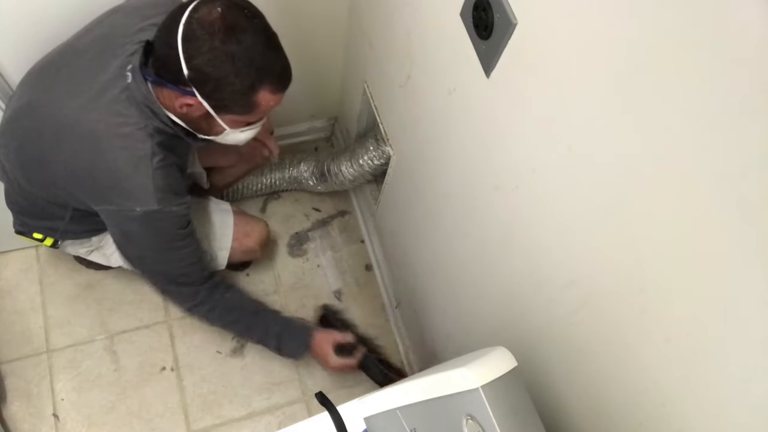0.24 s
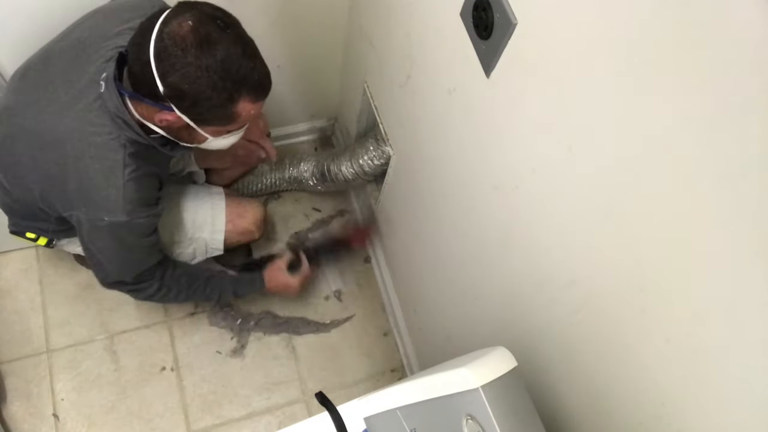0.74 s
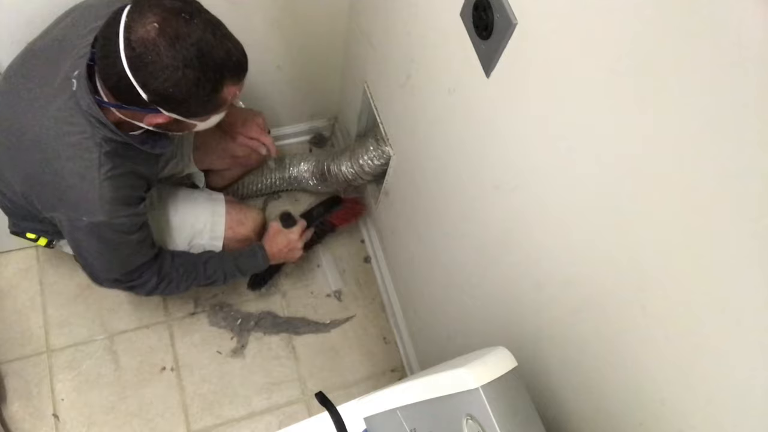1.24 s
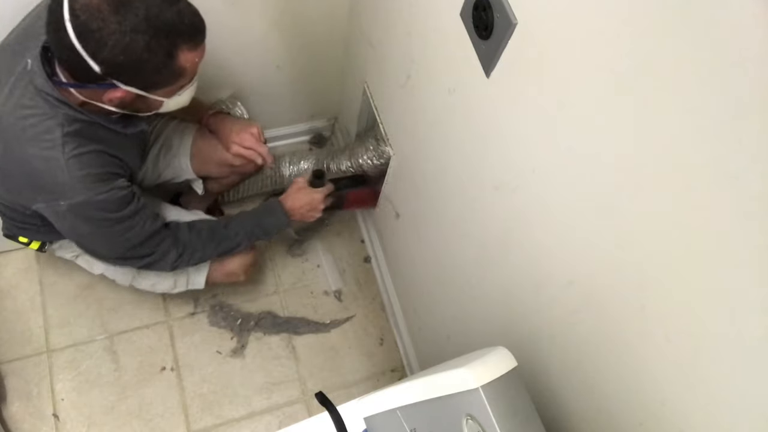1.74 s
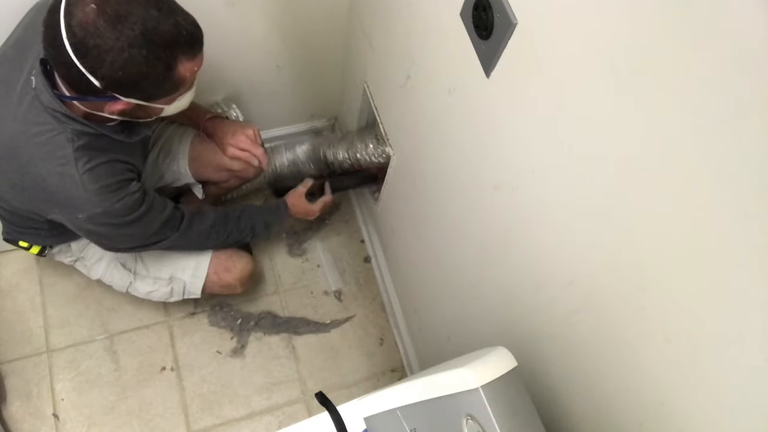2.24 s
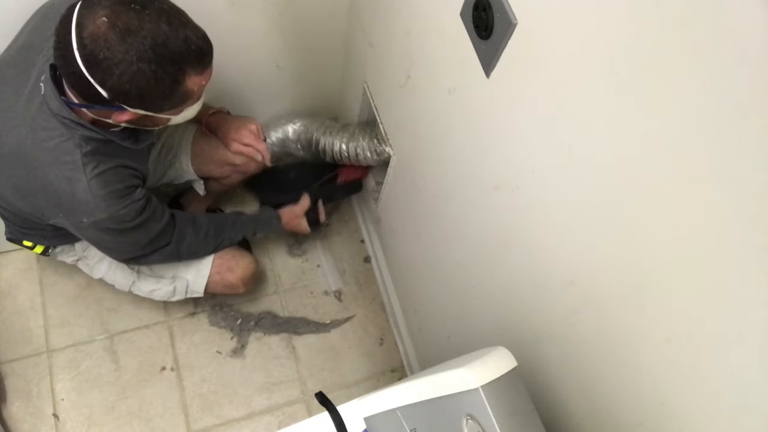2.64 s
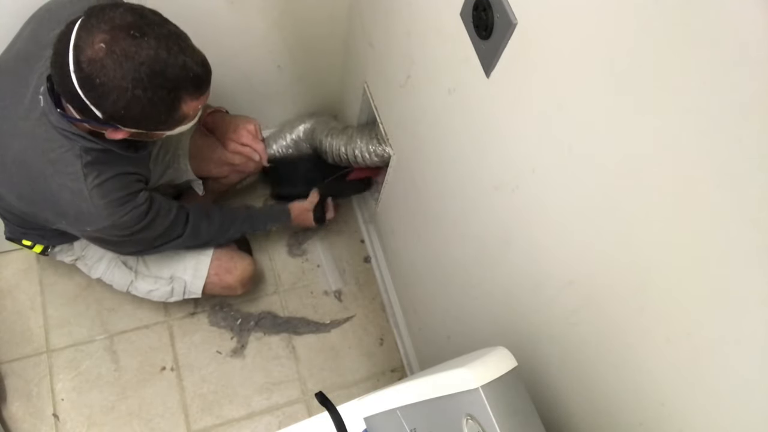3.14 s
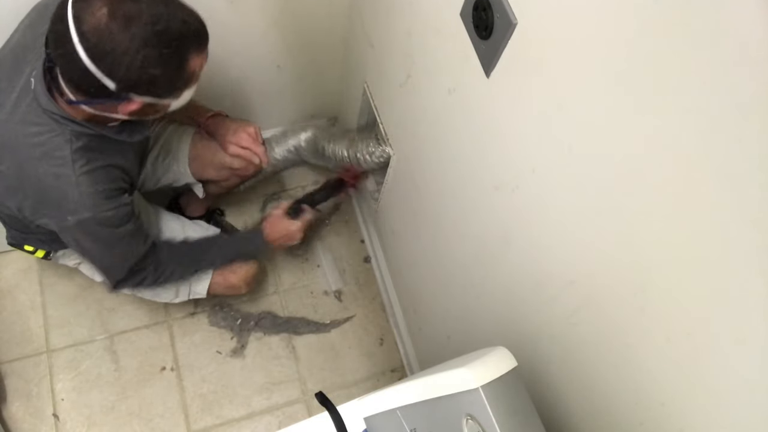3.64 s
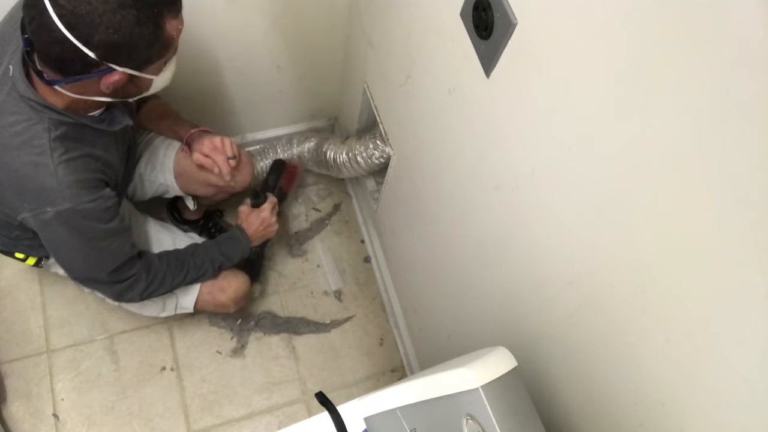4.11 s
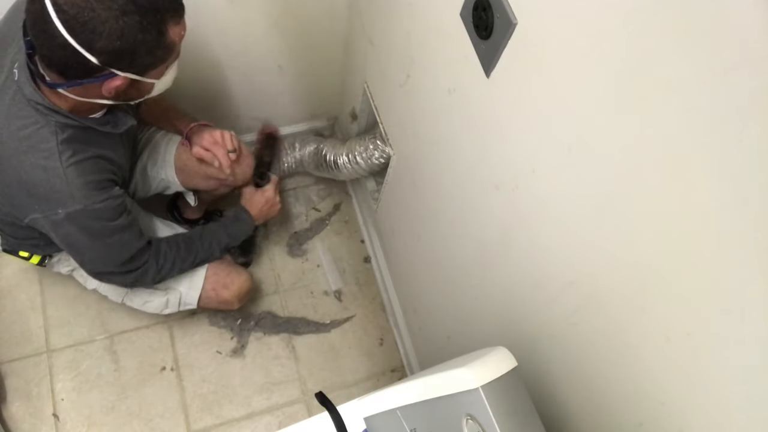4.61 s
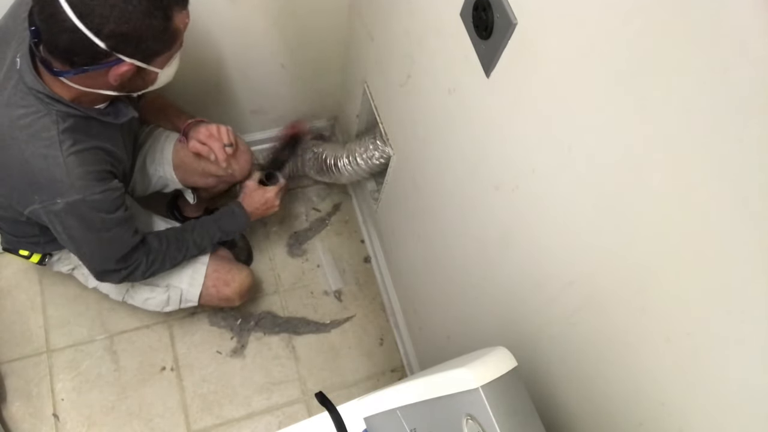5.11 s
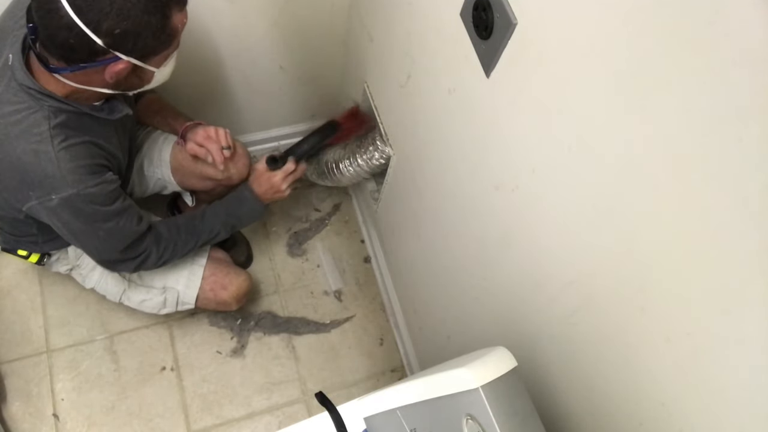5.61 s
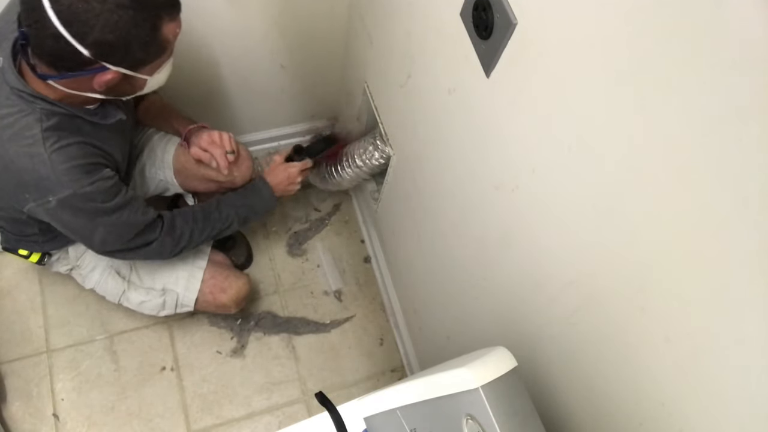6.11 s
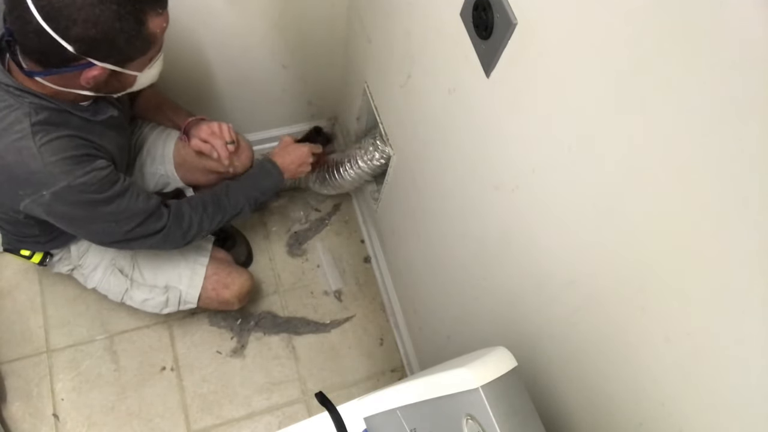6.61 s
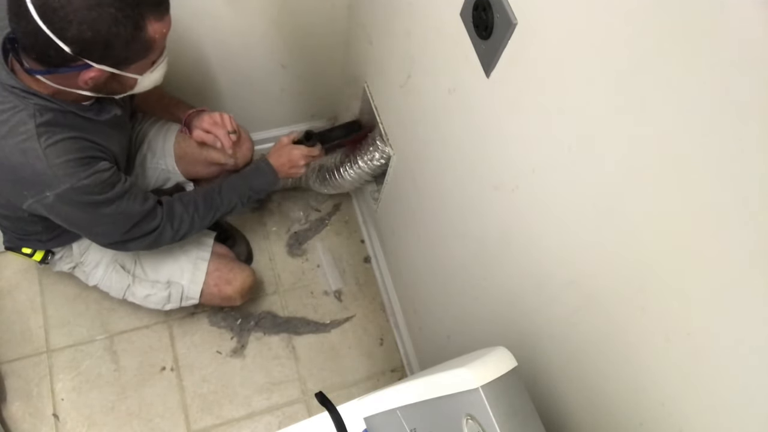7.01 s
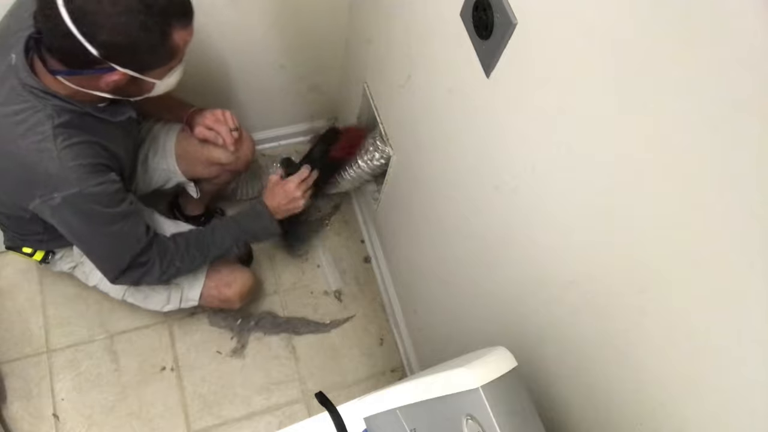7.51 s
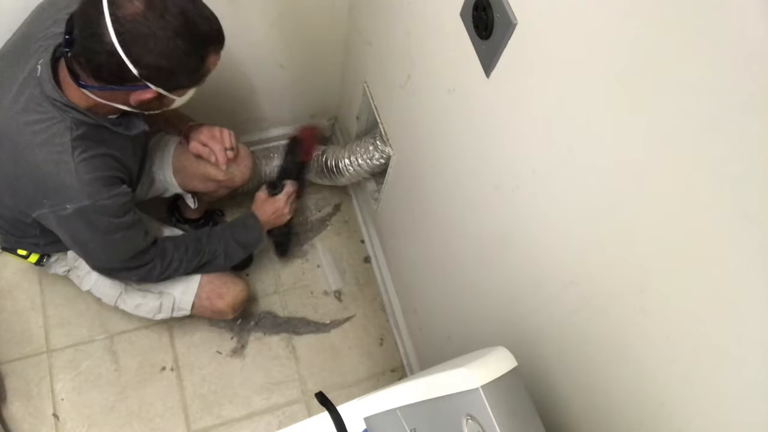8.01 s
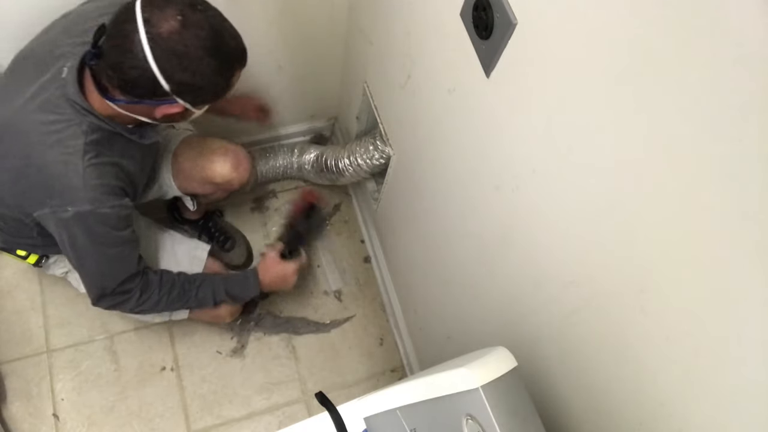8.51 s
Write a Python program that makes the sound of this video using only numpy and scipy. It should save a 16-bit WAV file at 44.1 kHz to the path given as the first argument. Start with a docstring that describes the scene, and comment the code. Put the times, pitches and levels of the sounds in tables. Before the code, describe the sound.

Stiff bristles brush a tile floor, quiet and quick at first, then scratch harder against skirting and wall. Two solid, boomy knocks stand out among the jabs. After a soft low rustle of clothing come strong separate swishes along a thin metal duct, a bright snap, and uneven dabbing with small plastic clacks that fades to almost nothing. Short indoor reflections, nearby microphone, faint steady room tone.

```python
"""Bristles hiss and flick over tile as a hand broom sweeps lint, then along a wall and a foil duct.
Random clicks over smooth noise, shaped stroke by stroke, drive coloured hiss, scrape and rumble;
two soft low rustles of sleeve or body are made the same way.
The broom's block knocks on wall and plastic dustpan, ringing their modes; grit ticks.
Tufts swish free, stiff bristles rasp and the rubbed wall panel drones.
Random reflections make the small room; faint air noise and wavering tones lie beneath."""
import sys
import numpy as np
from scipy import signal
from scipy.io import wavfile
from scipy.ndimage import uniform_filter1d

SR = 44100
rng = np.random.default_rng(int(sys.argv[2]) if len(sys.argv) > 2 else 0)


def digitize_waveform(pressure):
    """Quantize a signal to 16-bit integers and store it at the path in sys.argv[1].

    Rows of a 2-D input are taken as channels; values are limited to [-1, 1].
    """
    field = np.atleast_2d(pressure).T
    bounded = np.clip(field, -1, 1)
    quanta = np.round(bounded * 32767).astype(np.int16)
    wavfile.write(sys.argv[1], SR, quanta)


N = 385875

# Levels are relative, ahead of the layer gains, unless marked rms. Spectra set shape only.

# still room air: (frequency [Hz], density [dB per Hz])
AIR_SPECTRUM = [(20, -11), (45, 4), (120, -2.5), (175, -16), (240, -9), (400, -13), (700, -15.5),
                (1000, -19.5), (1300, -17.5), (3000, -25), (8000, -32), (15000, -34.5)]
AIR_RMS_DB = -63
# faint steady tones in the room: (frequency [Hz], rms level [dB])
ROOM_TONES = [(118.4, -68.5), (242, -78.5), (947.5, -81), (1055, -80.5), (1755, -85.5)]
# room decay: (frequency [Hz], t60 [s])
ROOM_DECAY = [(100, 0.4), (500, 0.33), (2000, 0.17), (6000, 0.22), (14000, 0.21)]
# wall panel modes: (frequency [Hz], level [dB], t60 [s])
WALL_MODES = [(55, -4.5, 0.22), (67, -2.5, 0.17), (90.1, -5.5, 0.33), (127, 1, 0.24), (146.8, 0.5, 0.18),
              (164, 1.5, 0.092), (204.4, -3, 0.13)]
# ribbed foil duct modes: (frequency [Hz], level [dB], t60 [s])
DUCT_MODES = [(570.4, 6.5, 0.22), (930, -23, 0.18), (1126, -1.5, 0.18), (1180, 11, 0.31), (1360, 7, 0.09),
              (1790, 20.5, 0.063), (2060, -13, 0.13), (2706, 24, 0.023), (2895, 21.5, 0.032),
              (4190, 18, 0.035)]
# plastic dustpan modes: (frequency [Hz], level [dB], t60 [s])
PAN_MODES = [(243, 4, 0.071), (295.3, 1, 0.11), (348.7, -2, 0.17), (424.4, -11.5, 0.21), (490, -15, 0.093),
             (885, -6, 0.073), (1253, -15, 0.12), (1914, -2.5, 0.025), (2770, -19, 0.056), (3340, -2, 0.02)]
# panel drone while the broom leans on it, 20 dB rise and fall:
# (time at full level [s], rise [s], hold [s], fall [s], rms level [dB])
LEANS = [(.7, 0.082, .15, .1, -64), (2.15, 0.34, 0.36, .45, -45), (3.55, .3, 0.063, 0.26, -44.5),
         (4.1, 0.25, 0.089, 0.45, -42.5), (5.835, 0.055, .03, .08, -41), (6.19, 0.04, 0.034, .06, -36.5),
         (6.62, 0.032, 0.011, 0.055, -34.5)]
# deep rumble of the hollow wall: (frequency [Hz], density [dB per Hz])
RUMBLE_SPECTRUM = [(25, -45), (38, -28), (52, -10), (74, -13.5), (90, -3.5), (112, -10), (138, -2.5),
                   (175, -11), (300, -25.5), (1000, -63)]
# broom's block shaken by its bristles: (frequency [Hz], density [dB per Hz])
BLOCK_SPECTRUM = [(90, -15), (175, -12), (212, 4.5), (245, -0.5), (290, -2), (345, 1.5), (430, -10),
                  (700, -15), (2000, -59.5)]
# firmness on the hollow wall, scaling the deep rumble: (time [s], level [dB])
WALL_FIRMNESS = [(0, -20), (1.1, -16), (1.7, 2), (2.7, -8.5), (4.2, 2.5), (5.4, -6), (5.9, -2), (6.7, -2),
                 (7.3, 0), (7.85, -1), (8.2, -8)]
# grit and snapping bristles: (time [s], level [dB])
TICK_EVENTS = [(0.045, -47), (.126, -53.5), (0.418, -61), (0.884, -58), (2.979, -36), (3.097, -36.5),
               (3.203, -43), (3.733, -38), (4.231, -39.5), (4.297, -54), (4.866, -50.5), (5.297, -46.5),
               (5.336, -42), (5.406, -33), (6.012, -47), (6.052, -45.5), (6.2108, -23), (6.2258, -16),
               (6.51, -35.5), (6.638, -32), (7.537, -47.5), (7.596, -44), (7.657, -48.5), (7.725, -46),
               (8.525, -56)]
# grit tick: (frequency [Hz], density [dB per Hz])
TICK_SPECTRUM = [(300, 0), (800, -9), (1300, 2.5), (2200, -4.5), (2950, 3), (3700, -2.5), (6000, -6),
                 (9000, -11.5), (15000, -22)]
# stiff bristles dragged end-on, 20 dB rise and fall:
# (time at full level [s], rise [s], hold [s], fall [s], level [dB])
RASPS = [(.595, 0.091, .01, 0.069, -51), (.995, 0.054, 0.0084, 0.044, -51), (6.213, .05, .005, 0.035, -40)]
# tufts springing free: (time [s], level [dB], fizz over it [dB])
SWISHES = [(2.458, -33, -20), (2.754, -46, -18), (3.267, -28.5, -21), (3.566, -28.5, -20),
           (4.501, -33, -19), (6.224, -46, -6), (7.779, -30.5, -18), (8.207, -38, -1), (8.313, -44, -12)]
# blows of the block:
# (time [s], crack [dB], wall boom [dB], dustpan clack [dB], treble over the crack [dB])
KNOCKS = [(1.59, -32.5, -37.5, -41.5, -8), (1.887, -37, -22, -30, -6), (1.903, -33, -29, -60, -7),
          (1.943, -33, -43, -40, -18), (2.229, -24, -15.5, -24, -13), (2.251, -32, -47, -29, -6),
          (2.58, -43, -35, -36.5, -13), (3.263, -48, -51, -53, 6), (3.421, -24, -21, -25, -6.5),
          (3.452, -31, -21, -45, -23), (4.692, -50, -46, -46.5, -21), (5.026, -30.5, -36, -36, -5),
          (5.452, -34, -52, -51, 0), (5.843, -42, -40, -42, -12), (6.211, -40, -46, -52, -2),
          (6.611, -40, -44, -38, -14), (7.248, -52, -33.5, -43, -10), (7.309, -33, -37, -28.5, 0),
          (7.389, -56, -42.5, -49, -15), (7.865, -32, -58, -34.5, -19), (7.998, -46, -49, -42, -9.5),
          (8.163, -34, -51, -31.5, -8.5), (8.232, -38, -41, -32.5, 0), (8.408, -37, -45, -36.5, -29)]
# crack of the block: (frequency [Hz], density [dB per Hz])
CRACK_SPECTRUM = [(150, -32.5), (550, 4.5), (700, -2.5), (1000, 3.5), (1700, 2), (2300, -5), (3300, -11.5),
                  (4400, -17.5), (8000, -21.5), (15000, -32)]
# bristle tips sliding on tile: (frequency [Hz], density [dB per Hz])
HISS_SPECTRUM = [(400, -12), (1500, -4), (2400, 0.5), (3100, 2), (4200, -0.5), (4950, -4.5), (5600, -2.5),
                 (7300, -6.5), (8400, -11.5), (10400, -14.5), (15500, -14)]
# fine fizz of the bristle tips: (frequency [Hz], density [dB per Hz])
FIZZ_SPECTRUM = [(2000, -41), (5000, 4.5), (7000, 4.5), (9500, 4.5), (10400, -3.5), (11500, 4), (15500, 3)]
# bristles dragged over skirting and duct: (frequency [Hz], density [dB per Hz])
SCRAPE_SPECTRUM = [(200, -12.5), (400, -6), (580, -2), (720, -2.5), (1050, 2), (1380, 4.5), (1900, 3.5),
                   (2400, -5.5), (3000, -16), (5000, -10.5), (9000, -56), (15000, -37)]
# strokes: long and light on tile, jabs into the corner, broad along the duct, quick dabs, drawing back;
# also soft low rustles of sleeve or body near 3.8 and 8.6 s;
# 20 dB rise and fall: (time at full pressure [s], rise [s], hold [s], fall [s], hiss [dB],
# scrape over hiss [dB], rumble over hiss [dB], fizz over hiss [dB])
STROKES = [(0.0, 0.049, 0.0092, 0.13, -55.5, -8, -6, 0.5), (0.13, 0.03, 0.03, 0.16, -61.5, -7, -11.0, -2.5),
           (0.451, 0.07, 0.068, 0.096, -50.5, -9, -6.5, -7.0),
           (0.6, 0.2, 0.051, 0.097, -47.5, -16, -12.5, -4.0),
           (0.89, 0.028, 0.05, 0.084, -72, -13, -15.5, 4),
           (1.004, 0.17, 0.0085, 0.12, -51.5, -7.5, -7.5, -12),
           (1.083, 0.076, 0.042, 0.14, -50, -10, -4, -3.5),
           (1.483, 0.03, 0.055, 0.31, -42, -4.5, -6.5, -10),
           (1.704, 0.15, 0.052, 0.058, -44.0, -3, -6, -10), (1.887, 0.061, 0.053, 0.146, -49, -7, -3, 0),
           (2.028, 0.081, 0.059, 0.086, -35, -5, -7.0, -13.0),
           (2.235, 0.157, 0.063, 0.36, -42, 0.5, -5, -13), (2.396, 0.04, 0.033, 0.068, -34, -5, -3, -14),
           (2.527, 0.037, 0.079, 0.205, -43.0, 0.5, -6.5, -12),
           (2.679, 0.052, 0.064, 0.044, -33.5, -5.5, -5, -17.0),
           (2.83, 0.061, 0.15, 0.14, -43, 1, 4.5, -15.0), (2.993, 0.07, 0.018, 0.038, -32.5, -5.5, -9, -19),
           (3.1, 0.088, 0.14, 0.15, -44, 2, 4, -11), (3.264, 0.029, 0.02, 0.12, -32.5, -3.0, -7, -16.5),
           (3.401, 0.04, 0.054, 0.2, -40.5, -3.5, -11, -16.0),
           (3.55, 0.033, 0.02, 0.14, -31, -2.5, -5, -10.5),
           (3.752, 0.062, 0.016, 0.07, -45.5, -3.5, 2.0, -11),
           (3.809, 0.054, 0.13, 0.099, -67, 5.5, 23.5, -15),
           (3.975, 0.07, 0.004, 0.027, -41.5, 3, 1, -12.5),
           (4.085, 0.092, 0.043, 0.056, -33.0, -4.5, -6.5, -8.5),
           (4.224, 0.048, 0.04, 0.17, -59.5, 2.5, 8.5, -5), (4.565, 0.097, 0.018, 0.053, -26, -6, -8.5, -8),
           (4.922, 0.043, 0.0063, 0.069, -47.5, 3.5, 0.5, -4),
           (5.028, 0.073, 0.0055, 0.051, -24, -5.5, -8.5, -11),
           (5.374, 0.056, 0.025, 0.096, -37, -1, 1, -20), (5.45, 0.084, 0.031, 0.04, -26, -6, -8.5, -9),
           (5.64, 0.074, 0.043, 0.24, -60, -10, -2, -12), (5.8, 0.061, 0.057, 0.08, -30.5, -3.5, -3.5, -9),
           (6.157, 0.11, 0.046, 0.067, -37.0, -6, -11, -13.0), (6.199, 0.058, 0.027, 0.2, -37, 1.5, 2, -21),
           (6.472, 0.052, 0.1, 0.1, -48, -1, -9, -11),
           (6.602, 0.081, 0.038, 0.036, -36.5, -6.5, -1.5, -8.5),
           (6.795, 0.13, 0.025, 0.076, -38.5, -2.5, -13, -13),
           (6.91, 0.067, 0.0067, 0.095, -35.0, -3.5, -1, -10.5),
           (7.109, 0.055, 0.014, 0.036, -40, -1, -17, -3), (7.214, 0.053, 0.024, 0.044, -34, -1, 0, -8.5),
           (7.303, 0.17, 0.073, 0.14, -45, 1.0, -7, -10), (7.592, 0.091, 0.0054, 0.15, -47.5, -3.5, -6, -3),
           (7.789, 0.073, 0.05, 0.095, -30.5, -5.5, -9.5, -8),
           (7.858, 0.052, 0.007, 0.152, -42, 4.5, 4.5, -18), (8.146, 0.029, 0.025, 0.099, -50, 1.5, 0, -10),
           (8.27, 0.1, 0.027, 0.069, -34.0, -1.5, -2, -10), (8.405, 0.062, 0.045, 0.12, -56, 5, 2, -22),
           (8.61, 0.061, 0.14, 0.12, -72, 6, 10.5, -13)]
# trail after each row, each layer against its swell: (hiss [dB], scrape [dB], rumble [dB], fizz [dB])
TRAIL_DB = (-20, -15, -2.5, -32)
TRAIL_FALL_S = 0.18  # over 20 dB
CONTROL_HZ = 1000
RISE_CURVE = 1.2  # over 1: pressure builds fastest at touch-down
SHAKE_LAG_S = 0.013  # block and wall shake after the bristles, as the stroke is checked
EDGE_HZ = 15650


def amp(db):
    """Converts dB to gain."""
    return 10 ** (np.asarray(db) / 20)


def unit(x):
    """Scales to rms 1."""
    return x / np.sqrt(np.mean(x ** 2) + 1e-20)


def read(points, hz):
    """Reads a table along a log-frequency axis."""
    table_hz, value = np.transpose(points)
    return np.interp(np.log(hz + 1), np.log(table_hz + 1), value)


def follow(rows):
    """Each column of a curve table, sample by sample."""
    time_s, *columns = np.transpose(rows)
    return [np.interp(np.arange(N) / SR, time_s, column) for column in columns]


def add(mix, time_s, sound):
    """Lays a sound into the mix at time_s."""
    part = mix[max(round(time_s * SR), 0):][:len(sound)]
    part += sound[:len(part)]


def late(x, delay_s):
    """Delays x by delay_s."""
    return np.interp(np.arange(N) - delay_s * SR, np.arange(N), x, left=0)


def through(x, response):
    """Passes x through an impulse response scaled to energy 1."""
    return signal.oaconvolve(x, response / np.linalg.norm(response))[:N]


def colour(x, spectrum, size=4096):
    """Minimum-phase filter with the given spectrum."""
    hz = abs(np.fft.fftfreq(size, 1 / SR))
    log_gain = np.log(amp(read(spectrum, hz)))
    response = np.fft.ifft(np.exp(np.conj(signal.hilbert(log_gain)))).real
    return through(x, response)


def ring(x, modes):
    """Rings a body's decaying modes, alternating in polarity."""
    t = np.arange(SR // 2) / SR
    response = np.zeros(len(t))
    for k, (hz, db, t60_s) in enumerate(modes):
        response += (-1) ** k * amp(db - 60 * t / t60_s) * np.sin(2 * np.pi * hz * t)
    return through(x, response)


def flicks(per_s, spread_db, smooth):
    """Bristles catch and let go: random clicks of uneven size over smooth sliding noise."""
    size = amp(spread_db * np.minimum(rng.exponential(1, N), 4))
    clicks = size * rng.choice([-1, 1], N) * (rng.random(N) < per_s / SR)
    return unit(unit(clicks) + smooth * rng.standard_normal(N))


def clumps(length_s):
    """Tufts grip and release together: smoothed noise of rms 1."""
    return unit(uniform_filter1d(rng.standard_normal(N), max(int(length_s * SR), 2)))


def contact(scatter, fall_s, rise_s=0.00023):
    """One impact and a short rattle, cushioned over rise_s; energy of 10 ms at rms 1."""
    t = np.arange(SR // 10) / SR
    rattle = rng.standard_normal(len(t)) * np.exp(-t / fall_s) * (1 - np.exp(-t / rise_s))
    blow = (t == 0) + scatter * rattle / np.linalg.norm(rattle)
    return blow / np.linalg.norm(blow) * np.sqrt(SR / 100)


def waver(hz, wander_hz):
    """A tone of rms 1 whose pitch drifts at random, by wander_hz rms."""
    drift = unit(uniform_filter1d(rng.standard_normal(N), size=3000))
    return np.sqrt(2) * np.sin(2 * np.pi * np.cumsum(hz + wander_hz * drift) / SR)


def swell(full_s, rise_s, hold_s, fall_s):
    """Pressure builds, holds, and lets go evenly in dB; a gain at the control rate."""
    t = np.arange(N * CONTROL_HZ // SR + 1) / CONTROL_HZ - full_s
    before = np.maximum(-t / rise_s, 0) ** RISE_CURVE
    after = np.maximum((t - hold_s) / fall_s, 0)
    return amp(-20 * (before + after))


def level(gains):
    """Joint level in dB of overlapping swells, sample by sample."""
    db = 10 * np.log10(np.sum(np.square(gains), axis=0) + 1e-14)
    return np.interp(np.arange(N) * CONTROL_HZ / SR, np.arange(len(db)), db)


def swells(rows):
    """The gain of a table of swells."""
    return amp(level([amp(db) * swell(*shape) for *shape, db in rows]))


def strokes():
    """Strokes and rustles swell and trail off: hiss in dB, then scrape, rumble and fizz over it."""
    layers = []
    for full_s, rise_s, hold_s, fall_s, hiss_db, *over_db in STROKES:
        press = swell(full_s, rise_s, hold_s, fall_s)
        trail = swell(full_s, rise_s, hold_s, TRAIL_FALL_S)
        gains = []
        for db, trail_db in zip([0, *over_db], TRAIL_DB):
            gains.append(amp(hiss_db + db) * np.maximum(press, amp(trail_db) * trail))
        layers.append(gains)
    hiss_db, *others_db = [level(layer) for layer in zip(*layers)]
    return [hiss_db] + [other_db - hiss_db for other_db in others_db]


def room(x, gap_s=.003):
    """Close walls: dense random reflections after a gap, decaying at a rate set by frequency."""
    t = np.arange(SR // 2) / SR
    taps = rng.standard_normal(len(t)) * (rng.random(len(t)) < 4000 / SR) * (t > gap_s)
    hz, age_s, bins = signal.stft(taps, SR, nperseg=256)
    decay = amp(-60 * age_s / read(ROOM_DECAY, hz)[:, None])
    return through(x, signal.istft(bins * decay, SR, nperseg=256)[1])


def moving_room(x, count=4, turn_hz=7):
    """The broom's tips move about and their wall paths change: a turning blend of rooms."""
    turn = 2 * np.pi * turn_hz * np.arange(N) / SR
    echoes = sum(room(x * np.cos(turn + np.pi * k / count)) for k in range(count))
    return echoes * np.sqrt(2 / count)


def still_air():
    """Steady noise with the spectrum of the still room."""
    return amp(AIR_RMS_DB) * colour(rng.standard_normal(N), AIR_SPECTRUM)


def room_tones():
    """Faint steady tones, each drifting slightly in pitch."""
    return sum(amp(db) * waver(hz, wander_hz=6.25) for hz, db in ROOM_TONES)


def drone():
    """The rubbed wall panel keeps sounding its main mode."""
    return swells(LEANS) * waver(hz=146.0, wander_hz=4.18)


def rumble(block_db=-4, wall_db=-2.5, boom_db=-8, boom_hz=90, boom_t60_s=0.5):
    """Strokes shake the broom's block and the wall, whose boom mode lingers; rustles add low noise."""
    hiss_db, _, weight_db, _ = strokes()
    push = late(amp(hiss_db + weight_db), SHAKE_LAG_S)
    block = push * colour(flicks(per_s=400, spread_db=2.5, smooth=0.41), BLOCK_SPECTRUM)
    shake = colour(flicks(per_s=380, spread_db=1.0, smooth=0.88), RUMBLE_SPECTRUM)
    wall = push * amp(follow(WALL_FIRMNESS)[0]) * shake
    # boom level is set against the wall's, ahead of wall_db
    boom = amp(boom_db) * unit(ring(wall, [(boom_hz, 0, boom_t60_s)])) * wall.std()
    return amp(block_db) * block + amp(wall_db) * wall + boom


def grit(gain_db=-2):
    """Short bright ticks of grit and single stiff bristles."""
    hits = np.zeros(N)
    for time_s, db in TICK_EVENTS:
        add(hits, time_s, amp(db) * contact(scatter=2.4, fall_s=0.0066))
    return amp(gain_db) * colour(hits, TICK_SPECTRUM)


def knocks(crack_gain_db=3, boom_gain_db=1.5, pan_gain_db=3, duct_db=-11, flex_s=0.0012):
    """Blows crack, splay bristles, ring duct and dustpan; the wall answers flex_s later."""
    crack, splay, wall, pan = np.zeros((4, N))
    for time_s, crack_db, boom_db, pan_db, treble_db in KNOCKS:
        add(crack, time_s, amp(crack_db) * contact(scatter=8.4, fall_s=0.016, rise_s=0.00022))
        splay_blow = contact(scatter=2.7, fall_s=0.01, rise_s=0.0034)
        add(splay, time_s, amp(crack_db + treble_db) * splay_blow)
        add(wall, time_s + flex_s, amp(boom_db) * contact(scatter=0.42, fall_s=0.022))
        add(pan, time_s, amp(pan_db) * contact(scatter=1.17, fall_s=0.016))
    sharp = colour(crack, CRACK_SPECTRUM) + amp(duct_db) * ring(crack, DUCT_MODES)
    sharp += colour(splay, HISS_SPECTRUM)
    clacks = amp(crack_gain_db) * sharp + amp(pan_gain_db) * ring(pan, PAN_MODES)
    return clacks, amp(boom_gain_db) * ring(wall, WALL_MODES)


def swishes(gain_db=2):
    """Bent tufts spring free in short bursts of noise."""
    slide, fizz = np.zeros((2, N))
    for time_s, db, fizz_db in SWISHES:
        burst = contact(scatter=15, fall_s=0.0097, rise_s=0.0017)
        add(slide, time_s, amp(db) * burst)
        add(fizz, time_s, amp(db + fizz_db) * burst)
    return amp(gain_db) * (colour(slide, HISS_SPECTRUM) + colour(fizz, FIZZ_SPECTRUM))


def rasp(hz=3100, pass_width_hz=800):
    """Flicks ring the stiff bristles' own broad resonance, filtered twice."""
    b, a = signal.iirpeak(hz, hz / pass_width_hz, fs=SR)
    chatter = flicks(per_s=2500, spread_db=7.0, smooth=0.55)
    resonant = signal.lfilter(b, a, signal.lfilter(b, a, chatter))
    return swells(RASPS) * unit(resonant)


def broom(clump_db=2.5, scratch_db=1.3, duct_gain_db=-9, hiss_gain_db=-3.0, fizz_gain_db=0,
          scrape_gain_db=-1.83, snag_from_db=-131, snag_range_db=18):
    """Bristle flicks hiss and fizz on the surface and scrape over the ribs of the duct."""
    hiss_db, scrape_db, _, fizz_db = strokes()
    # full snagging except where the scrape is all but silent
    snag = np.clip((hiss_db + scrape_db - snag_from_db) / snag_range_db, .2, 1)
    stroke = amp(hiss_db + clump_db * snag * clumps(length_s=.008))
    slide = stroke * flicks(per_s=3500, spread_db=4, smooth=1.0)
    fizz = stroke * amp(fizz_db) * flicks(per_s=3000, spread_db=-1.0, smooth=0.38)
    scratch = amp(scrape_db + scratch_db * clumps(length_s=.005))
    drag = stroke * scratch * flicks(per_s=1300, spread_db=2.5, smooth=0.65)
    tips = amp(hiss_gain_db) * colour(slide, HISS_SPECTRUM)
    tips += amp(fizz_gain_db) * colour(fizz, FIZZ_SPECTRUM)
    scrape = amp(scrape_gain_db) * colour(drag, SCRAPE_SPECTRUM)
    return tips + scrape + amp(duct_gain_db) * ring(drag, DUCT_MODES)


def scene(direct_db=-1.5, room_db=-6, low_room_db=-14):
    """Broom, blows, rustles and grit in the room, over its faint steady air."""
    clacks, boom = knocks()
    near = broom() + rasp() + swishes() + clacks + grit()
    low = boom + rumble()
    echo = amp(room_db) * moving_room(near) + amp(low_room_db) * room(low)
    background = still_air() + room_tones() + drone()
    return (amp(direct_db) * near + low + echo + background)[None]


def record(dry, low_cut_hz=36):
    """The microphone's low cut and the recorder's band limit."""
    high_pass = signal.butter(4, low_cut_hz, "high", fs=SR, output="sos")
    cut = signal.sosfilt(high_pass, dry)
    band_limit = signal.firwin(401, EDGE_HZ, window=("kaiser", 9), fs=SR)
    return signal.oaconvolve(cut, band_limit[None], "same")


dry = scene()
out = record(dry)
digitize_waveform(out)
```